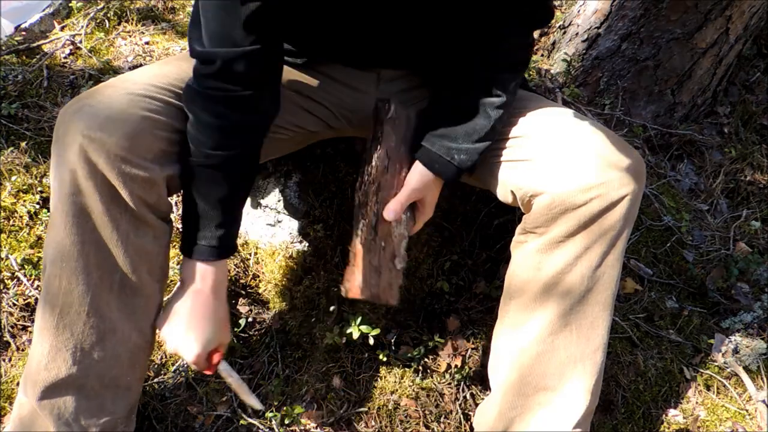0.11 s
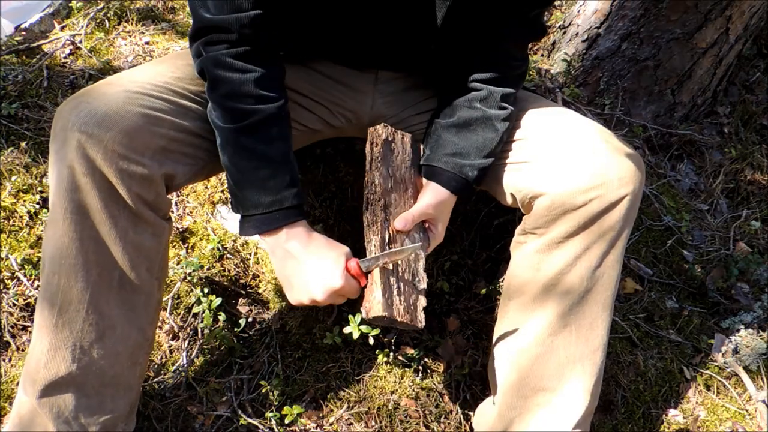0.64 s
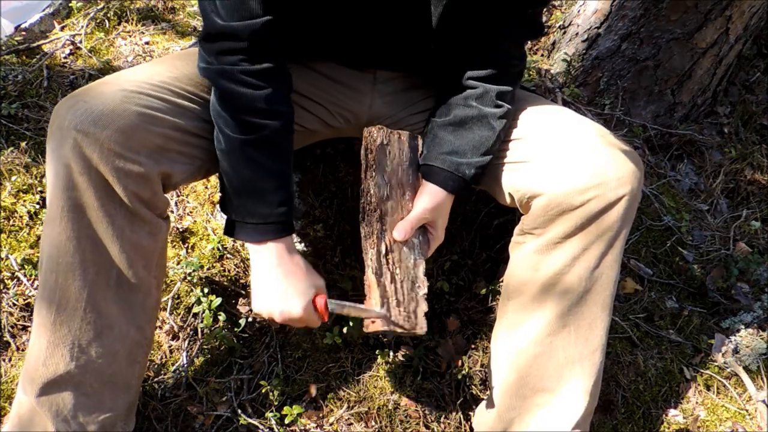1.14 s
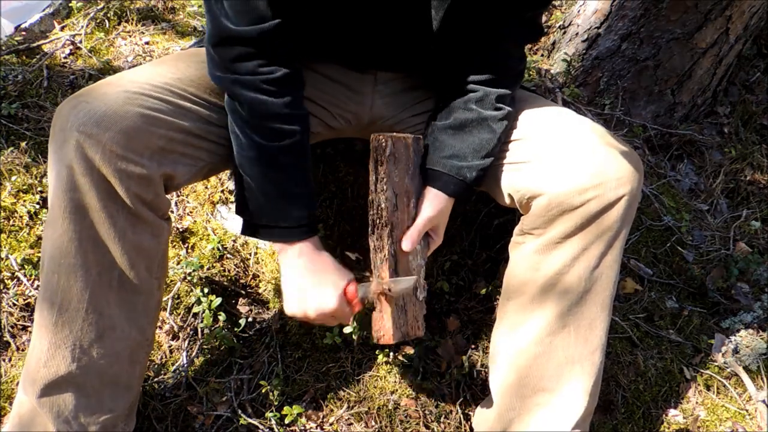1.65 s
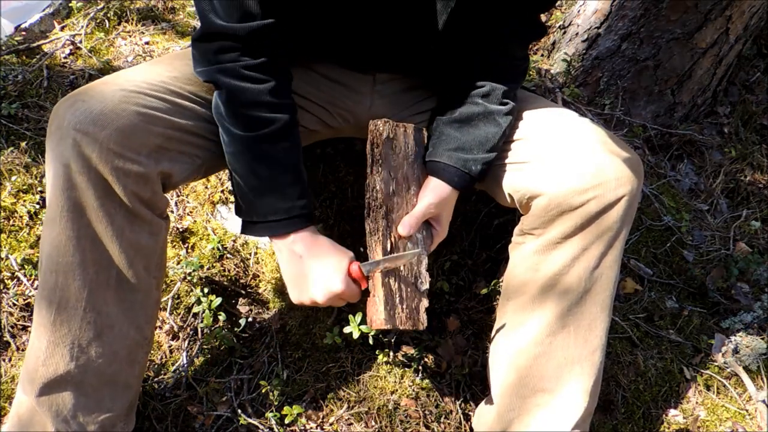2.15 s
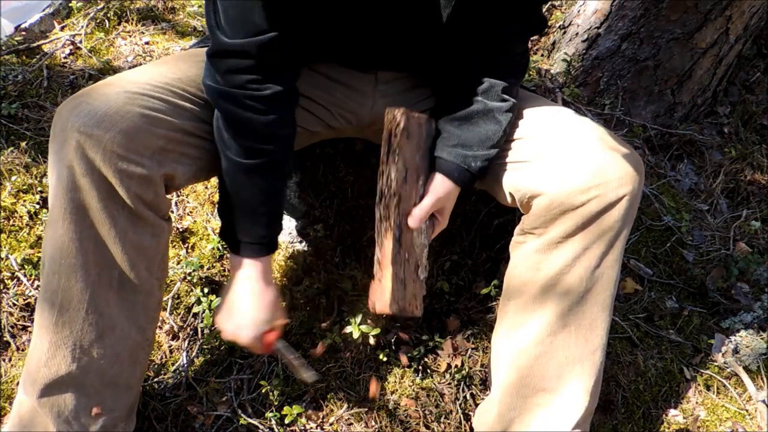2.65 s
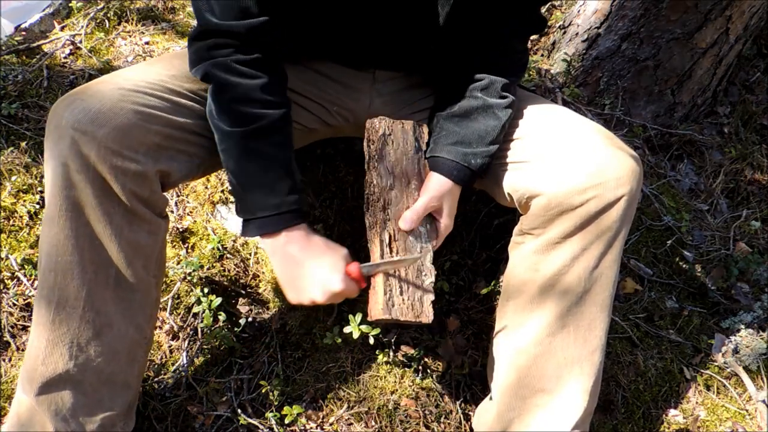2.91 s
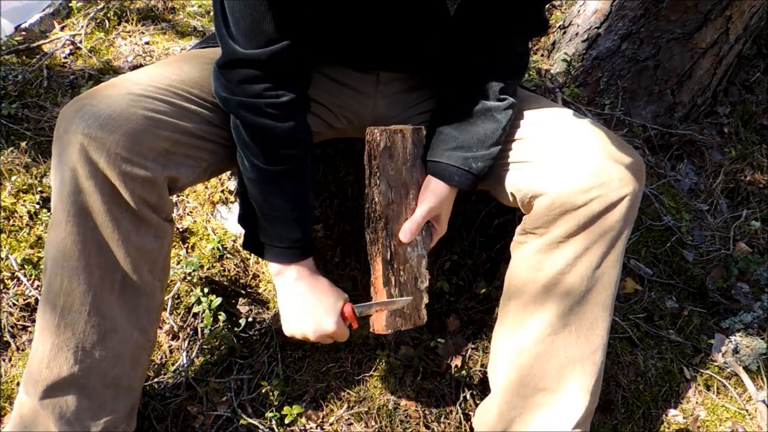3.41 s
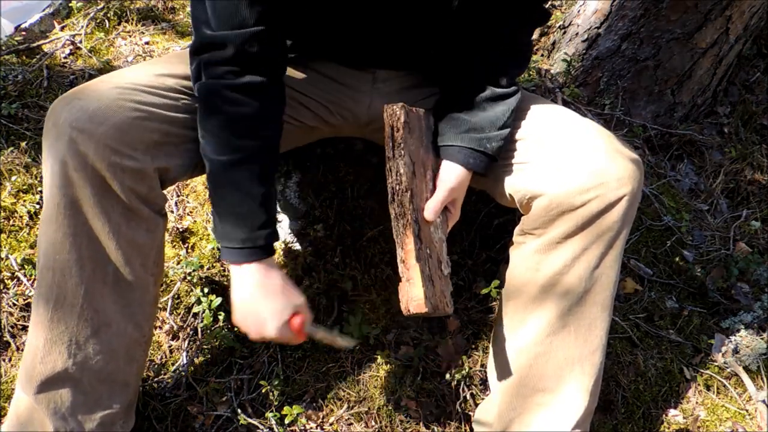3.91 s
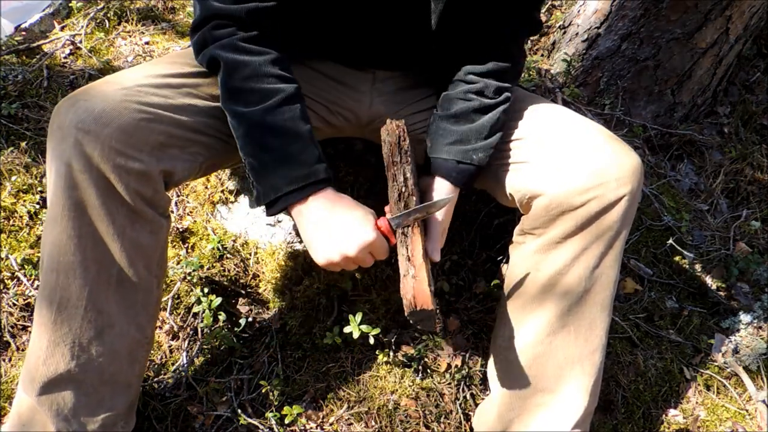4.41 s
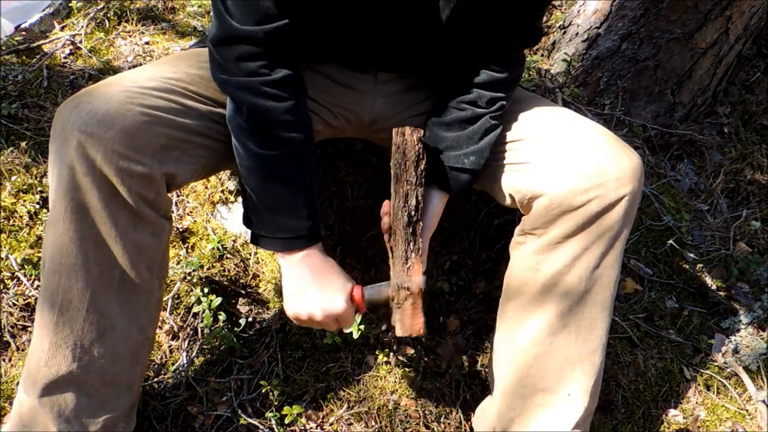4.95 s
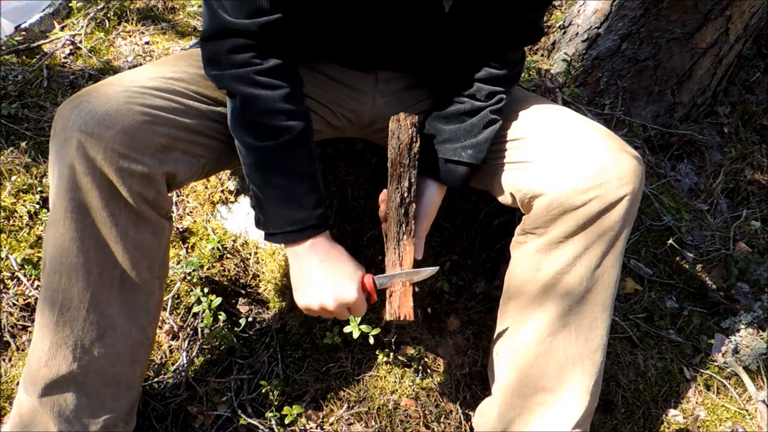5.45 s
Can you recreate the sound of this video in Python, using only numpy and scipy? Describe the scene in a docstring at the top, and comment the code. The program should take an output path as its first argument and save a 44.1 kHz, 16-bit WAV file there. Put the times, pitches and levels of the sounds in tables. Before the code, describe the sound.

Short, uneven knife cuts crackle and snap through a hand-held bark slab while crumbs tick and a far bird whistles faintly.

```python
"""A knife whittles a hand-held slab of thick bark in a quiet forest, close to the two microphones of a camera.
Each bite or push of the blade is a burst of tiny fractures that crackle and knock the slab's modes.
Jolts knock the slab too, two light taps ring the steel, and crumbs tick and rustle in clumps.
A far bird whistles in gliding tones with a short tail from the trunks.
Shaped noise makes the low steady rumble and the hiss of the microphones."""
import sys
import numpy as np
from scipy import signal
from scipy.fft import rfft, irfft, next_fast_len
from scipy.io import wavfile
from scipy.ndimage import uniform_filter1d

SR = 44100
rng = np.random.default_rng(int(sys.argv[2]) if len(sys.argv) > 2 else 0)


def materialize(psi):
    """Save the field psi as 16-bit PCM at rate SR to the path in sys.argv[1].

    A 1-D psi becomes a single channel; in a 2-D psi each row is a channel.
    """
    bounded = np.clip(np.atleast_2d(psi).T, -1, 1)
    quanta = np.round(bounded * 32767).astype(np.int16)
    wavfile.write(sys.argv[1], SR, quanta)


def makeup_ratio(level_db):
    """Linear amplitude ratio for a level in decibels (20 dB per factor of ten)."""
    decades = np.asarray(level_db, float) / 20
    return 10 ** decades


N = 245637  # length in samples

FRACTURES_PER_S = 6000
FIBRE_KINDS = 4  # colours of crackle on each side of the slab
TURN_S = 4.2  # from here the slab is cut on its thin side


def knife():
    """The force on the blade swells and lets go; the same fractures crackle, ring and knock."""
    slab_power, crackle_power, snaps = cuts()
    rattle_power, blows = jolts()
    centre = clicks(FRACTURES_PER_S, spread_db=1.5) + snaps
    # fibres breaking left and right of the centre
    edge = np.outer([1, -1], clicks(FRACTURES_PER_S, spread_db=1.5))
    wood = slab(slab_power + rattle_power, blows, centre + 0.14 * edge)
    fibres = crackle(crackle_power, centre + 0.43 * edge)
    return wood + fibres


# Bites into a ridge, close by: the crackle starts quickly and dies away by 20 dB in dying_ms.
# ring_db is the slab's level against the crackle. Columns: peak_s, crackle_db, dying_ms, ring_db
BITES = [(.061, -36, 3.5, -36), (0.1308, -35.5, 2, -18), (0.1699, -24, 30.3, -13.5),
         (0.1814, -14, 7.3, -22), (0.413, -41, 38, -21), (.436, -40, 13, -27), (.662, -37.5, 3.4, -2.5),
         (.676, -40.5, 8.3, -4), (0.9058, -25, 7.2, -17), (0.943, -29, 42, -16), (0.9736, -18.5, 4.2, -11),
         (.98, -33.5, 46, -9), (1.0023, -23.5, 16.5, -16.5), (1.4088, -30.5, 15.4, -17),
         (1.5304, -29, 8.2, -11.5), (1.547, -26, 17.6, -18.5), (1.587, -31.5, 12, -33),
         (1.619, -31.5, 48, -16), (2.195, -41, 12, -11), (1.6872, -27, 1.2, -32),
         (1.7096, -25.5, 14.6, -18), (1.8183, -15.5, 13.5, -18.5), (1.8418, -9.5, 9.9, -21.5),
         (1.9357, -33.5, 2.2, -34), (2.0505, -36.5, 20, -14), (2.2569, -34.5, 4.7, -6),
         (2.2637, -31.5, 4.4, -25), (2.359, -28.5, 13.7, -16), (2.4394, -17.5, 7.2, -19),
         (2.4478, -8.5, 0.82, -24), (2.4708, -26.5, 49, -15), (2.594, -38.5, 13, -12),
         (2.6204, -24, 7.2, -13.5), (2.773, -24.5, 40, -12.5), (2.7855, -22, 13, -9),
         (2.8172, -24.5, 12, -12.5), (2.8983, -45, 22, -7.5), (3.1084, -43, 18, -8.5),
         (3.1244, -22, 1.5, -18), (3.1303, -26, 14.4, -17), (3.2752, -26, 9.7, -21.5),
         (3.323, -23, 9.9, -19), (3.3475, -18.5, 11.7, -17), (3.3607, -29.5, 23.6, -11),
         (3.4226, -25, 2.4, -22), (3.4427, -30, 14.6, -10.5), (3.6664, -21.5, 7.5, -11.5),
         (3.685, -33, 8.8, -37), (3.8478, -41, 19, -29), (3.8744, -13, 2.7, -32), (3.878, -19.5, 8, -14),
         (3.8851, -16.5, 14.8, -11.5), (3.976, -32, 24, -19), (4.0552, -30.5, 5, -36),
         (4.0901, -35.5, 1.2, -22), (4.3231, -33.5, 9, -16), (4.493, -31, 4, -22), (4.499, -25.5, 9.8, -24),
         (4.5257, -32, 60, -18), (4.5285, -23.5, 12, -37), (4.5658, -28, 23.5, -18.5),
         (4.593, -42, 9, -7.5), (4.72, -35, 2.8, -34), (4.768, -23, 25, -25), (4.7896, -25.5, 35, -20.5),
         (4.8067, -27, 9, -19), (4.829, -26, 1.4, -27), (4.849, -33, 3, -21), (4.8623, -17, 2.1, -31),
         (4.891, -28, 84, -15.5), (4.916, -30.5, 36, -26), (4.9295, -19, 3.2, -36), (4.9346, -27, 2.7, -34),
         (4.9573, -24, 20.5, -17), (4.983, -34, 1.4, -21), (5.107, -35.5, 2.4, -29),
         (5.1392, -27, 1.5, -23), (5.1654, -11, 3.2, -21.5), (5.1701, -17.5, 12, -14.5),
         (5.176, -26, 42.4, -13.5), (5.1889, -22, 11.4, -10.5), (5.198, -35, 2.6, -21),
         (5.2962, -42.5, 26, -30), (5.426, -41.5, 25, -21), (5.487, -37, 5.6, -18), (5.502, -38, 3.3, -6),
         (5.5362, -34, 3.6, -34)]
BITE_RISE_MS, BITE_RISE_SHARE = 0.74, 0.3  # a bite that dies slowly also starts a little more softly
# The hand leans on the blade: the crackle swells by 20 dB in swelling_ms until the chip gives way.
# Columns: peak_s, crackle_db, swelling_ms, ring_db
PUSHES = [(0.598, -36.5, 11, -19), (0.887, -34.5, 47, -18), (0.9671, -23, 25, -11), (1.08, -36.5, 26, -10),
          (1.303, -38, 9, -34), (1.3478, -37, 8.5, -27), (1.5409, -15, 4.5, -36), (1.635, -18, 10, -20),
          (1.8548, -19.5, 21, -15.5), (1.8705, -11, 9.6, -20.5), (1.878, -16.5, 20, -22.5),
          (2.0067, -34.5, 22, -19), (2.3243, -32.5, 25, -14.5), (2.4558, -30, 11, -17),
          (2.4802, -11.5, 7, -17.5), (2.4903, -19.5, 18, -13.5), (3.2365, -33.5, 11, -16.5),
          (3.4372, -21.5, 9.5, -18), (4.672, -32.5, 8, -34), (4.8669, -18, 4, -22),
          (4.8742, -17.5, 11, -26), (4.906, -26.5, 22, -24), (4.951, -32, 5, -19), (5.1567, -13, 10.6, -20),
          (5.1623, -15, 6.6, -11), (5.556, -36, 22, -15.5)]
PUSH_FALL_MS, PUSH_FALL_SHARE = 0.37, 0.47  # a longer push lets go more slowly
KNOCK_TOP_HZ = 1000  # the modes below it make the knock
KNOCK_DB, THIN_KNOCK_DB = -9.5, -15  # low modes against the ring, cut on the broad and on the thin side


def cuts():
    """Each cut drives slab modes and one kind of fibre with its force, and snaps off a chip at its peak."""
    slab_power = np.zeros((len(SLAB), N))
    crackle_power = np.zeros((2 * FIBRE_KINDS, N))
    snaps = np.zeros(N)
    low = np.array([hz < KNOCK_TOP_HZ for hz, _, _ in SLAB])
    strokes = [(s, db, BITE_RISE_MS + BITE_RISE_SHARE * ms, ms, ring_db) for s, db, ms, ring_db in BITES]
    strokes += [(s, db, ms, PUSH_FALL_MS + PUSH_FALL_SHARE * ms, ring_db) for s, db, ms, ring_db in PUSHES]
    for s, db, rise_ms, fall_ms, ring_db in strokes:
        # each cut lands on another spot: it favours other modes and tears another kind of fibre
        spot_db = 3.0 * rng.standard_normal(len(SLAB))
        kind = rng.integers(FIBRE_KINDS)
        thin = s > TURN_S
        start, power = force(s, db, rise_ms, fall_ms)
        span = slice(start, start + len(power))
        crackle_power[kind + FIBRE_KINDS * thin, span] += power
        knock_db = (THIN_KNOCK_DB if thin else KNOCK_DB) * low
        slab_power[:, span] += power * makeup_ratio(2 * (ring_db + knock_db + spot_db))[:, None]
        # short cuts are mostly this snap
        snaps[round(s * SR)] = 2.5 + 2.15 * np.exp(-(rise_ms + fall_ms) / 25.0)
    return slab_power, crackle_power, snaps


# Jolts of the slab in the hand; modes near one pitch answer, by where it is held and hit.
# Columns: peak_s, level_db (before the blow and rattle gains), favoured_hz
JOLTS = [(.172, -44, 400), (.18, -33, 1750), (.661, -38, 350), (.96, -34, 380), (.968, -38, 850),
         (0.973, -35, 1850), (.992, -35, 300), (1.53, -40, 300), (1.633, -37, 330), (1.82, -38, 400),
         (1.861, -45, 400), (2.256, -33.5, 330), (2.441, -31.5, 370), (2.487, -27, 373),
         (2.489, -26.5, 2200), (2.621, -33, 300), (2.619, -34, 2230), (2.782, -32.5, 390),
         (3.239, -41, 300), (3.325, -38, 330), (3.3465, -30.5, 390), (3.365, -37, 390), (3.4363, -26, 338),
         (3.666, -28, 464), (3.666, -32.5, 1910), (3.668, -31, 2620), (3.88, -27, 330), (3.881, -29, 540),
         (3.883, -40, 1750), (4.812, -36, 540), (4.865, -39, 500), (5.166, -30, 870), (5.168, -39, 330),
         (5.197, -36, 370), (5.503, -37.5, 330)]
JOLT_RISE_MS, JOLT_FALL_MS = 7.4, 11.6
JOLT_SPREAD_DB_PER_OCTAVE = 24  # loss of the modes away from the favoured pitch
JOLT_BLOW_DB, JOLT_RATTLE_DB = 22, -7


def jolts():
    """A jolt is one clean blow with a rattle of fractures around it, shared out among nearby modes."""
    rattle_power = np.zeros((len(SLAB), N))
    blows = np.zeros((len(SLAB), N))
    mode_hz = np.transpose(SLAB)[0]
    for s, db, favoured_hz in JOLTS:
        start, power = force(s, db, JOLT_RISE_MS, JOLT_FALL_MS)
        octaves = abs(np.log2(mode_hz / favoured_hz))
        share = makeup_ratio(-JOLT_SPREAD_DB_PER_OCTAVE * octaves)
        rattle = power * share[:, None] ** 2 * makeup_ratio(2 * JOLT_RATTLE_DB)
        rattle_power[:, start:start + len(power)] += rattle
        blows[:, round(s * SR)] += share * makeup_ratio(db + JOLT_BLOW_DB)
    return rattle_power, blows


def force(s, db, rise_ms, fall_ms):
    """First sample and power of a force that gains 20 dB in its rise and loses them in its fall."""
    start = max(round((s - .2) * SR), 0)
    stop = min(round((s + .35) * SR), N)
    from_peak_ms = (np.arange(start, stop) / SR - s) * 1000
    rise = -from_peak_ms / max(rise_ms, .3)
    fall = from_peak_ms / max(fall_ms, .3)
    return start, makeup_ratio(2 * (db - 20 * np.where(from_peak_ms < 0, rise, fall)))


# Modes of the bark slab held close to the microphones. Columns: pitch_hz, width_hz, gain_db
SLAB = [(240, 400, -2), (388.5, 81, -5.5), (540, 240, -7.5), (853, 123, -5.5), (1118, 150, -15.5),
        (1390, 260, -13.5), (1704, 167, -8), (1872, 110, -8), (2203, 270, -5.5), (2730, 540, -7.5)]


def slab(mode_power, blows, fractures):
    """Fractures and blows ring the damped modes of the slab."""
    wood = np.zeros((2, N))
    for power, blow, (hz, width_hz, db) in zip(mode_power, blows, SLAB):
        drive = np.sqrt(power) * fractures + blow
        wood += makeup_ratio(db) * signal.oaconvolve(drive, mode(hz, width_hz)[None], axes=1)[:, :N]
    # a small slab radiates no bass
    high_pass = signal.butter(N=2, Wn=210, btype="high", fs=SR, output="sos")
    return signal.sosfilt(high_pass, wood)


# Spectrum of the breaking bark, also used for its crumbs. Columns: pitch_hz, relative_db (per Hz)
CRACKLE = [(1500, -55.5), (2050, -20), (2350, -12.5), (3000, -13), (4600, -6.5), (5400, -5), (8000, -3),
           (11000, -3), (14000, -0.5), (15500, -4.5)]
# Other colour of the thin side of the slab. Columns: pitch_hz, change_db (against the spectrum above)
THIN_SIDE = [(1500, -8), (2050, 0), (2400, 3), (3200, 2), (5000, 2.5), (12000, 0)]


def crackle(kind_power, fractures):
    """Each kind of fibre colours the fractures with its own variation of the bark's spectrum."""
    # only the level column varies
    variation = 2.27 * rng.standard_normal((2 * FIBRE_KINDS, len(CRACKLE), 1)) * [0, 1]
    fibres = CRACKLE + variation
    fibres[FIBRE_KINDS:, :, 1] += read(THIN_SIDE, fibres[0, :, 0])
    out = np.zeros((2, N))
    for power, points in zip(kind_power, fibres):
        out += signal.oaconvolve(np.sqrt(power) * fractures, colour(points)[None], axes=1)[:, :N]
    return out * makeup_ratio(0.23 * np.array([[1], [-1]]))  # a little to the left


# The blade tapped free of the bark, close by. Columns: start_s, level_db
TAPS = [(2.051, -35.5), (2.133, -45)]
# Modes of the thin steel. Columns: pitch_hz, gain_db, t60_s
BLADE = [(8000, -5, 0.034), (9300, 2.5, 0.067)]


def blade():
    """Light taps set the decaying modes of the thin steel ringing."""
    out = np.zeros(N)
    t = np.arange(4000) / SR
    ring = sum(makeup_ratio(db - 60 * t / t60) * np.sin(2 * np.pi * hz * t) for hz, db, t60 in BLADE)
    for s, db in TAPS:
        out[round(s * SR):][:len(t)] += makeup_ratio(db) * ring
    return out


def nearby(x, db=-9, t60=0.0013):
    """Legs, hand and ground send back quick reflections, other ones to each microphone."""
    at = np.arange(8, 900, 12) + rng.integers(0, 12, (2, 75))
    reflections = rng.choice([-1., 1.], at.shape) * makeup_ratio(-60 * at / SR / t60)
    taps = np.zeros((2, 1024))
    np.put_along_axis(taps, at, reflections, 1)
    taps = np.diff(taps, prepend=0)  # small uneven surfaces scatter mostly treble
    taps *= makeup_ratio(db) / np.linalg.norm(taps, axis=1, keepdims=True)
    taps[:, 0] = 1  # direct sound
    return signal.oaconvolve(x, taps / np.sqrt(1 + makeup_ratio(2 * db)), axes=1)[:, :N]


# Crumbs rustling between strokes; random clumps vary the level. Columns: time_s, level_db
RUSTLE = [(0, -63), (.75, -57), (1.05, -67), (1.4, -55.5), (2, -58.5), (2.25, -49.5), (2.55, -65), (3, -60),
          (3.25, -51), (3.6, -65), (4, -55.5), (4.4, -62), (4.75, -56), (5, -77), (5.25, -58),
          (5.57, -51.5)]
CRUMBS_PER_S = 2800  # in each of three streams of ticks


def rustle():
    """Crumbs come in clumps and tick with the colour of the bark, on either side."""
    s, db = np.transpose(RUSTLE)
    clumps = evened(uniform_filter1d(uniform_filter1d(rng.standard_normal(N), 500), 300))
    level = makeup_ratio(np.interp(np.arange(N) / SR, s, db) + 5.6 * clumps)
    middle, left, right = (clicks(CRUMBS_PER_S, spread_db=8.0) for _ in range(3))
    ticks = level * (0.61 * middle + 0.79 * np.array([left, right]))
    return signal.oaconvolve(ticks, colour(CRACKLE)[None], axes=1)[:, :N]


# A far bird among the trunks, one row a whistle. Columns: start_s, length_ms, first_hz, last_hz, level_db
WHISTLES = [(.298, 48, 3430, 2590, -54.5), (.345, 63, 3100, 2384, -61), (.686, 60, 3190, 2590, -50.5),
            (.745, 40, 2630, 3260, -62), (1.715, 37, 2480, 2350, -56), (1.788, 34, 2920, 2700, -54),
            (2.06, 40, 2560, 2460, -62)]


def bird():
    """Gliding, slightly rough whistles, smeared by the trunks into a short tail."""
    out = np.zeros(N)
    for s, length_ms, first_hz, last_hz, db in WHISTLES:
        u = np.linspace(0, 1, round(length_ms * SR / 1000))
        hz = last_hz + (first_hz - last_hz) * (1 - u) ** 2.19  # quick at first, then levelling out
        tone = np.sqrt(2) * np.sin(2 * np.pi * np.cumsum(hz) / SR)
        envelope = np.sin(np.pi * u ** 0.39) ** 0.34
        out[round(s * SR):][:len(u)] += makeup_ratio(db) * tone * envelope
    out *= 1 + 0.38 * evened(uniform_filter1d(rng.standard_normal(N), 150))  # roughness
    t = np.arange(SR // 2) / SR
    trunks = rng.standard_normal((2, len(t))) * makeup_ratio(-60 * t / 1.0) * (t > .02)  # t60 of 1 s
    trunks /= np.linalg.norm(trunks[0])
    return out + makeup_ratio(0.5) * signal.oaconvolve(out[None], trunks, axes=1)[:, :N]


# Rumble of the place and hiss of the microphones. Columns: pitch_hz, relative_db (per Hz)
AIR = [(12, -36), (20, 6.5), (85, -2), (397, -10.5), (599, -14), (855, -14), (1400, -18), (2630, -17),
       (4080, -19), (12900, -23.5), (14000, -20)]
AIR_DB = -49  # rms level of the whole background
# Likeness of the background at the two microphones. Columns: pitch_hz, likeness (1 = the same)
SAME = [(60, 0.97), (180, 0.89), (540, 0.53), (1640, 0.079), (4940, 0.043), (14900, 0.055)]


def air():
    """Steady noise, alike in both microphones only in the bass, drifting a little in patches."""
    frames, hz = N // 256 + 5, np.fft.rfftfreq(1024, 1 / SR)
    a, b, c, d, patches = rng.standard_normal((frames, 513, 5)).T
    patches = evened(uniform_filter1d(uniform_filter1d(patches, 12, 0), 14, 1))
    drift_db = 0.94 * patches * np.minimum(hz / 500, 1)[:, None]  # less drift in the bass
    same = np.clip(read(SAME, hz), -1, 1)[:, None]
    left, other = a + 1j * b, c + 1j * d
    z = np.array([left, same * left + np.sqrt(1 - same ** 2) * other])
    z *= makeup_ratio(read(AIR, hz)[:, None] + drift_db)
    noise = signal.istft(z, nperseg=1024, noverlap=768)[1][:, :N]
    return makeup_ratio(AIR_DB) * evened(noise)


def evened(x):
    """Scales to rms 1."""
    return x / np.sqrt(np.mean(x ** 2) + 1e-20)


def read(points, hz):
    """Value of a spectrum table on a log-frequency axis."""
    f, value = np.transpose(points)
    return np.interp(np.log(hz + 1), np.log(f + 1), value)


def colour(points, size=1024):
    """Causal (minimum-phase) impulse response of energy 1 with the given spectrum."""
    log_gain = np.log(makeup_ratio(read(points, abs(np.fft.fftfreq(size, 1 / SR)))))
    taps = np.fft.ifft(np.exp(np.conj(signal.hilbert(log_gain)))).real[:size // 2]
    return taps / np.linalg.norm(taps)


def mode(hz, width_hz):
    """Impulse response of energy 1 of a damped mode."""
    t = np.arange(2048) / SR
    taps = np.exp(-np.pi * width_hz * t) * np.sin(2 * np.pi * hz * t)
    return taps / np.linalg.norm(taps)


def clicks(per_s, spread_db):
    """Random clicks of either sign and rms 1, a few much larger than the rest."""
    happens = rng.random(N) < per_s / SR
    sign = rng.standard_normal(N)
    size = np.minimum(rng.exponential(1, N), 3.2)
    return evened(happens * sign * makeup_ratio(spread_db * size))


def scene():
    """Everything at the two microphones."""
    return nearby(knife() + blade()) + rustle() + bird() + air()


def top_cut(x):
    """Nothing passes above the cut-off."""
    return signal.sosfilt(signal.butter(12, 15470, fs=SR, output="sos"), x)


# Band limit of the camera behind its microphones. Columns: pitch_hz, gain_db
EDGE = [(14150, 0), (14400, -20), (16300, -50), (17000, -90)]


def record(dry):
    """The camera's band limit takes away the highest treble of the mix."""
    size = next_fast_len(N + SR)
    gain = makeup_ratio(read(EDGE, np.fft.rfftfreq(size, 1 / SR)))
    limited = irfft(rfft(dry, size) * gain, size)[:, :N]
    return top_cut(limited)


dry = scene()
out = record(dry)
materialize(out)
```